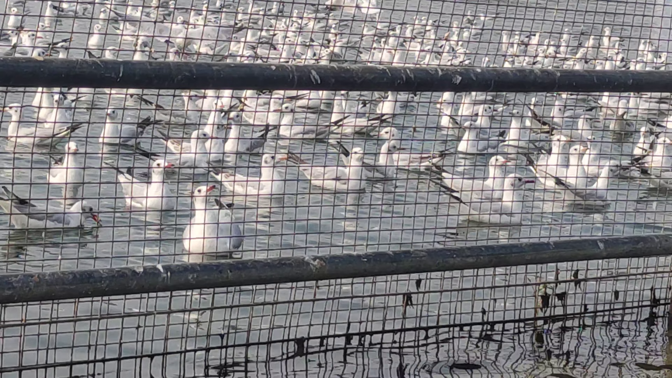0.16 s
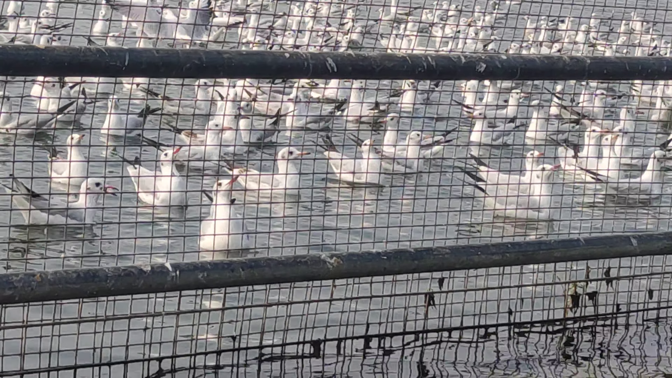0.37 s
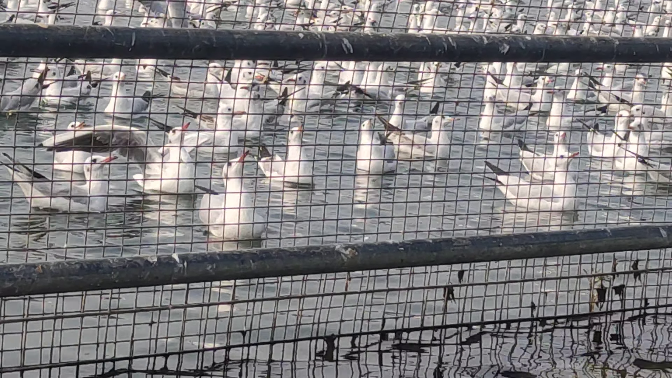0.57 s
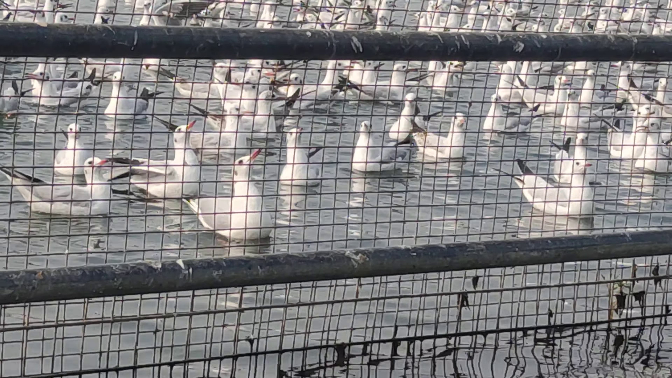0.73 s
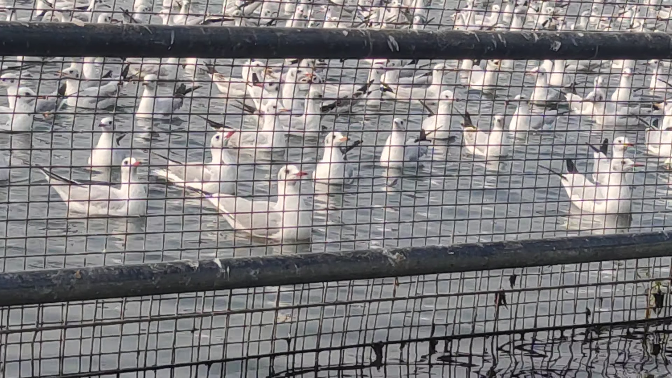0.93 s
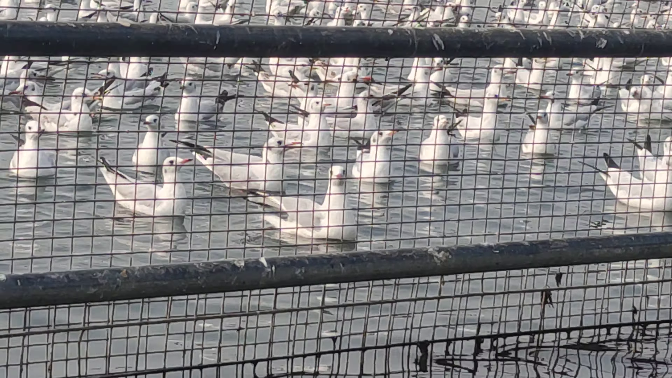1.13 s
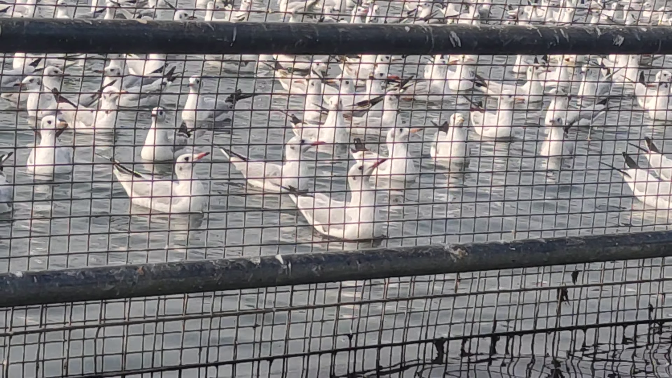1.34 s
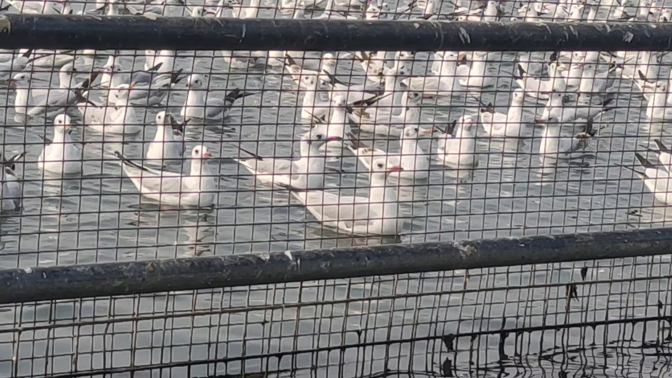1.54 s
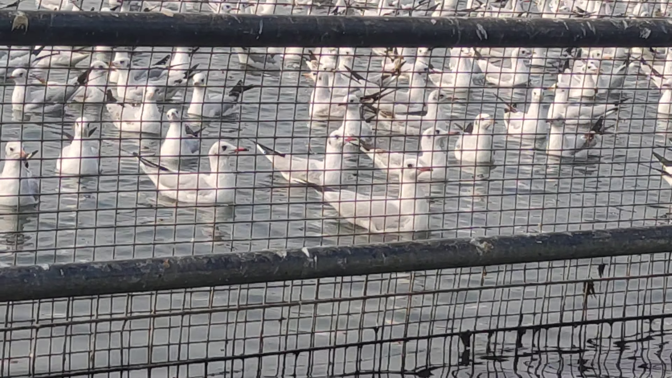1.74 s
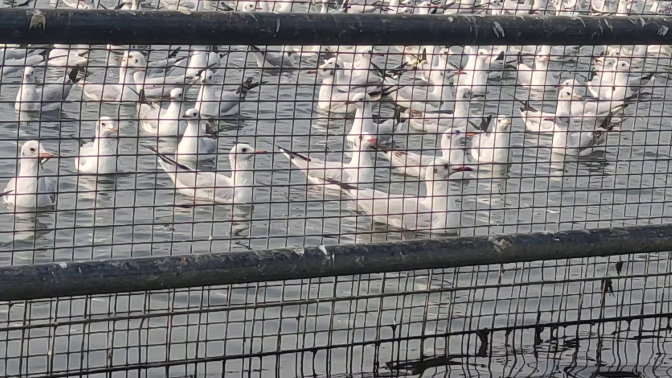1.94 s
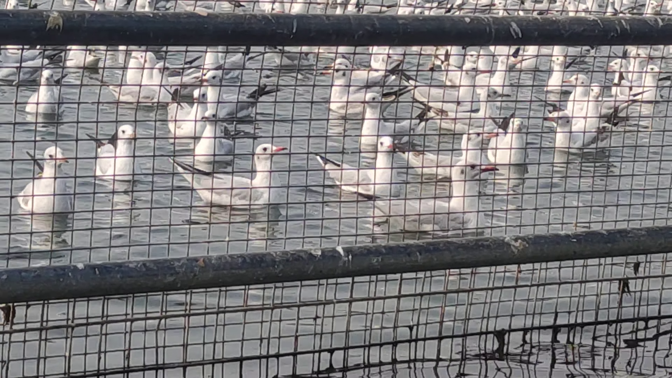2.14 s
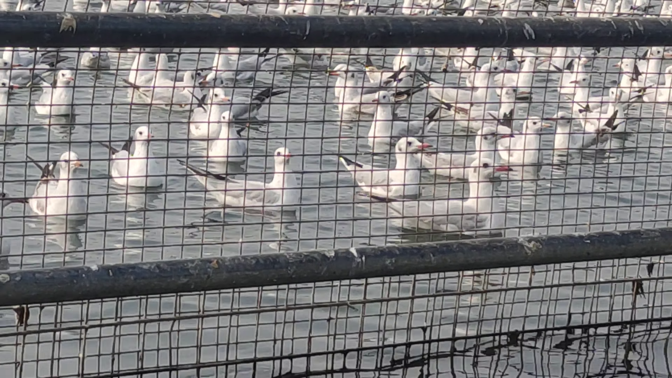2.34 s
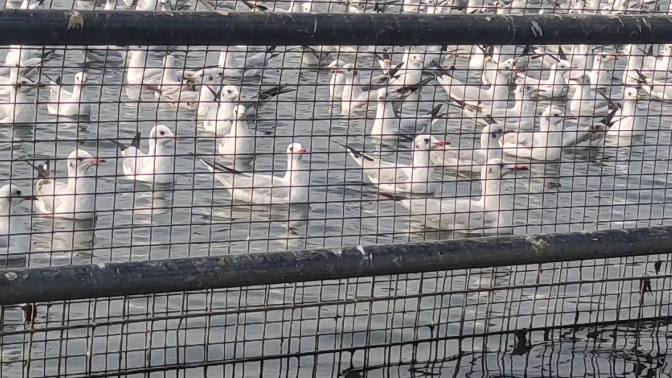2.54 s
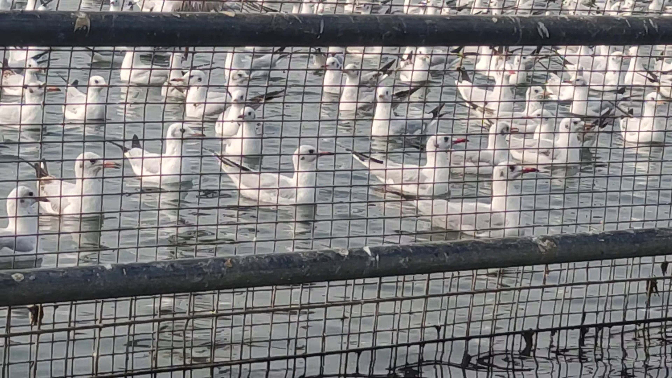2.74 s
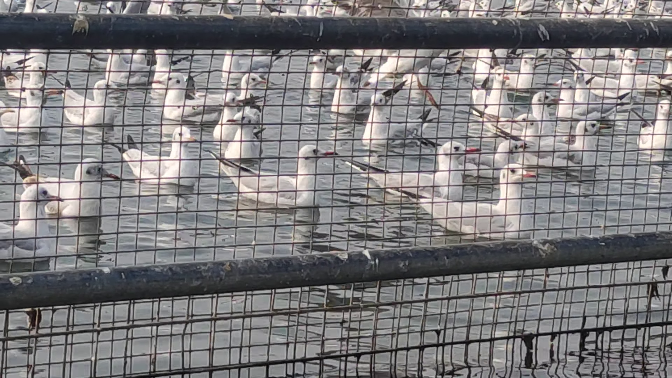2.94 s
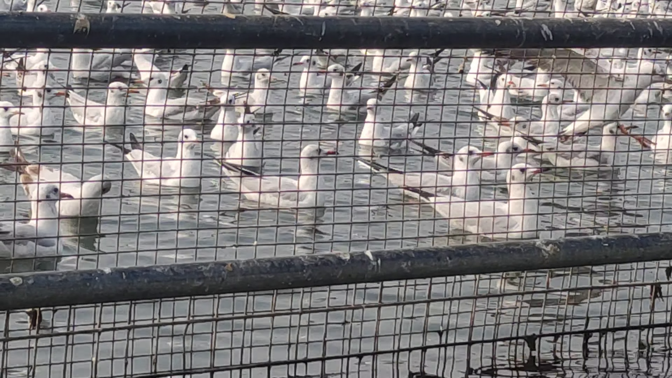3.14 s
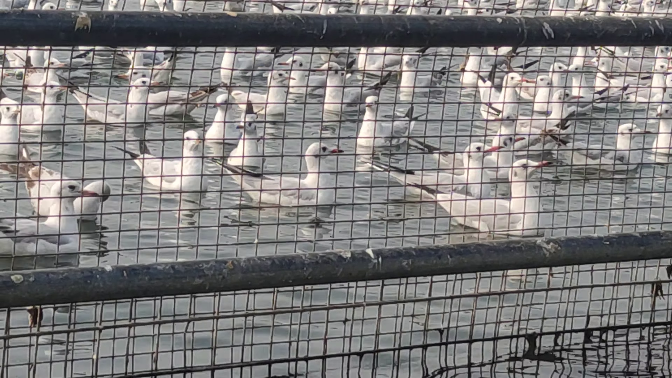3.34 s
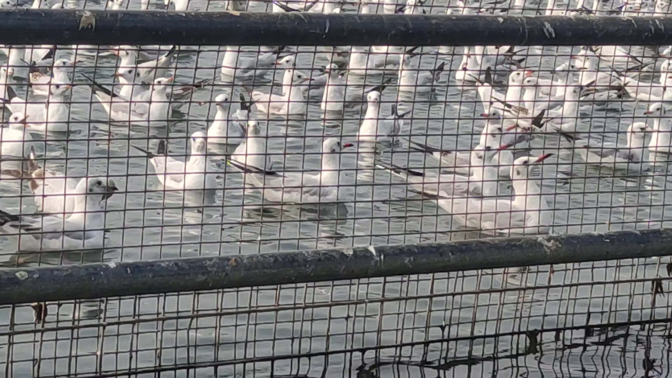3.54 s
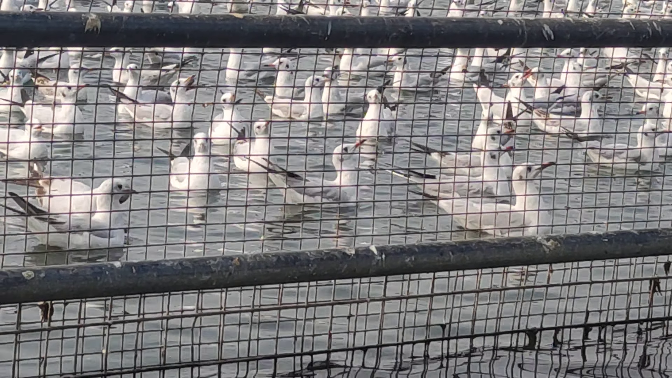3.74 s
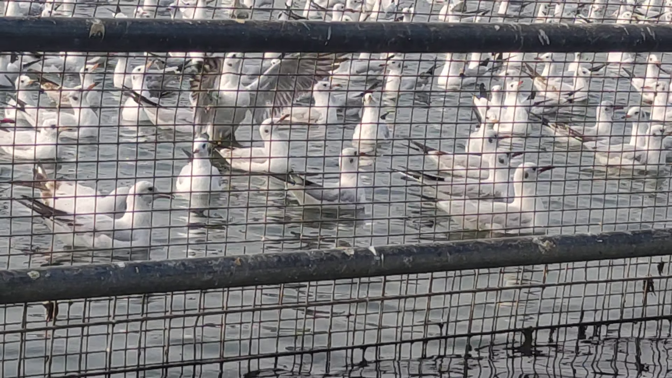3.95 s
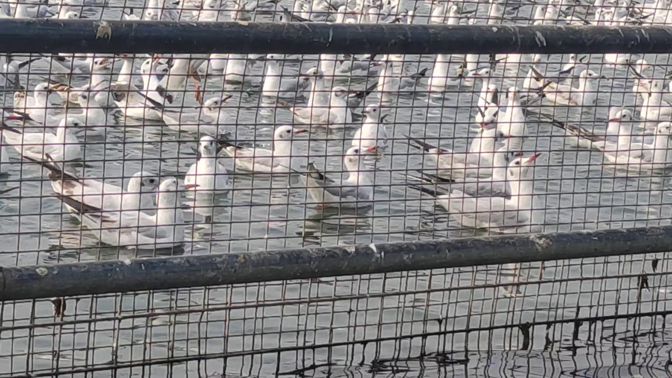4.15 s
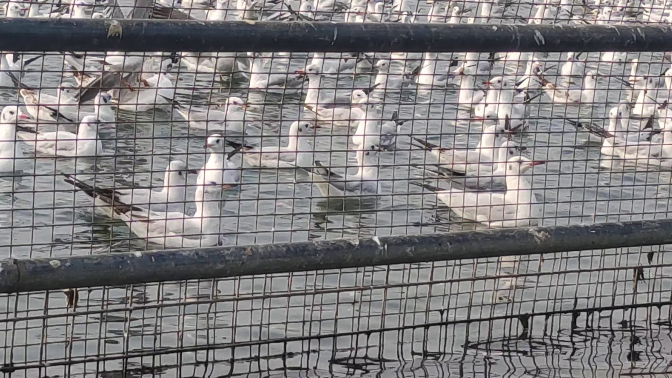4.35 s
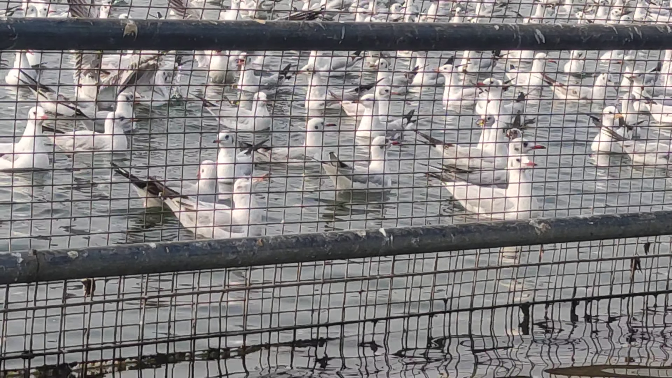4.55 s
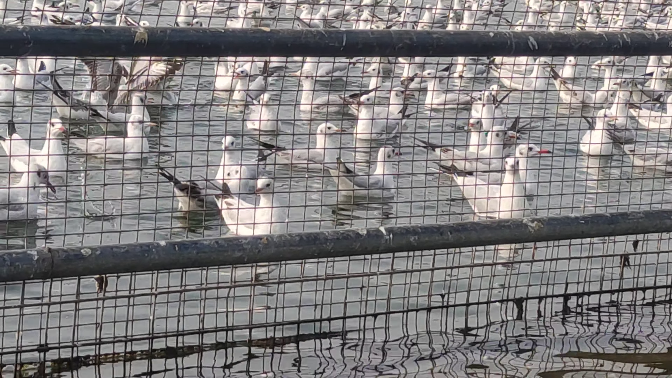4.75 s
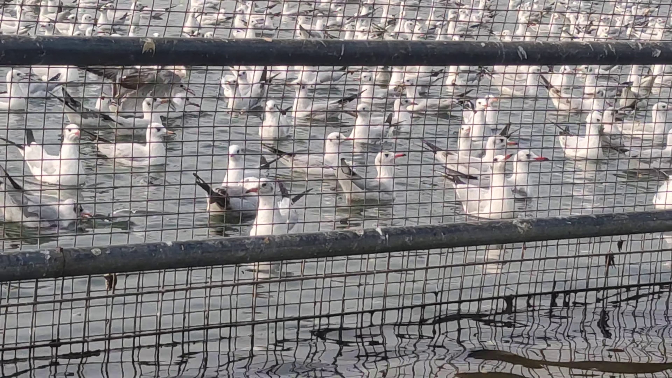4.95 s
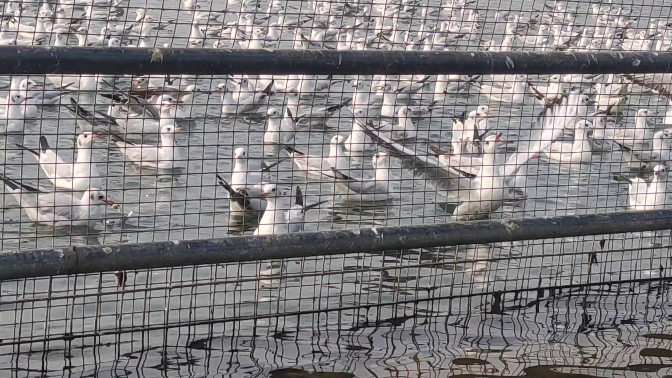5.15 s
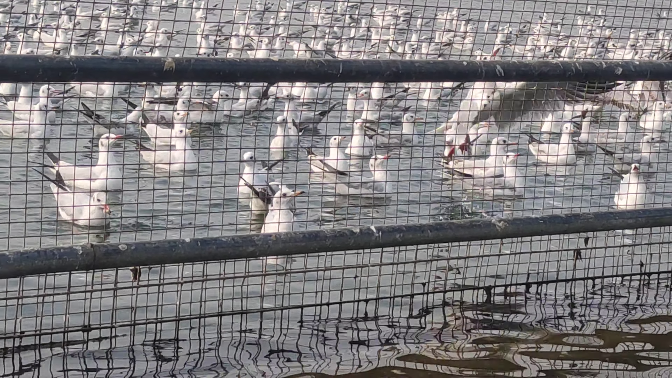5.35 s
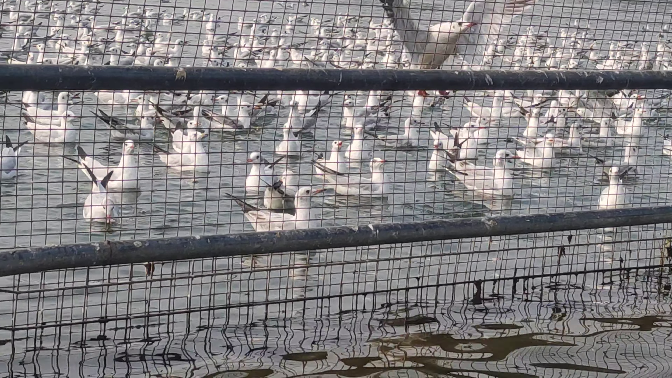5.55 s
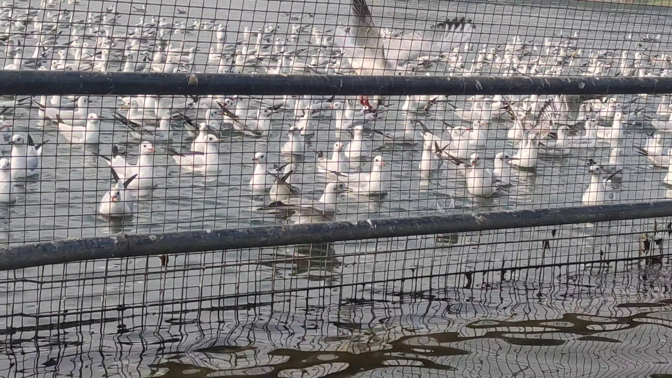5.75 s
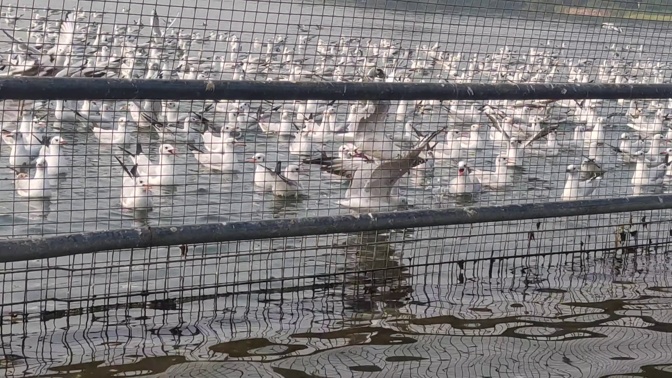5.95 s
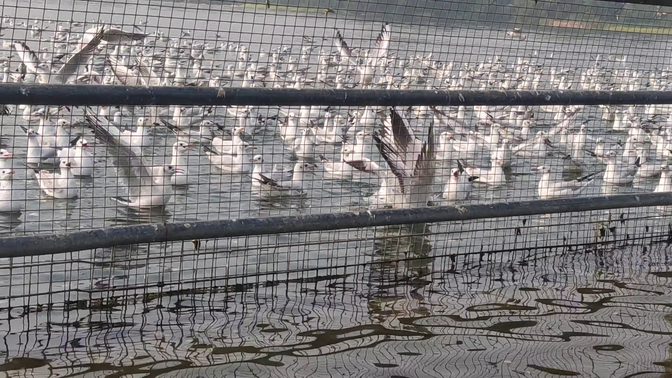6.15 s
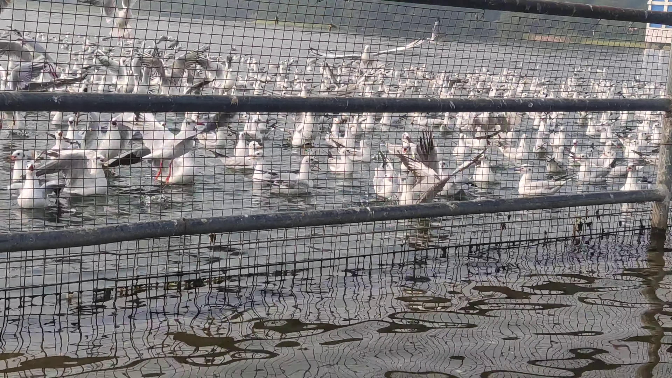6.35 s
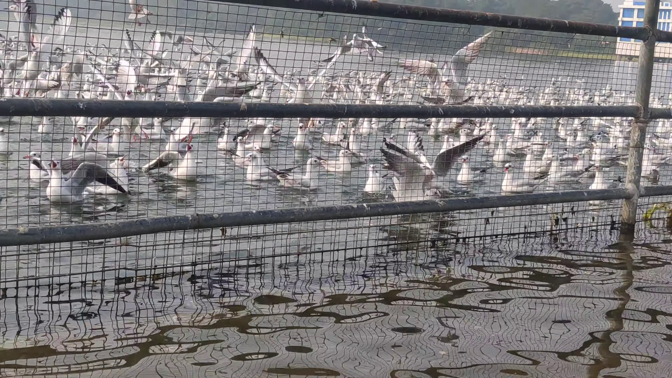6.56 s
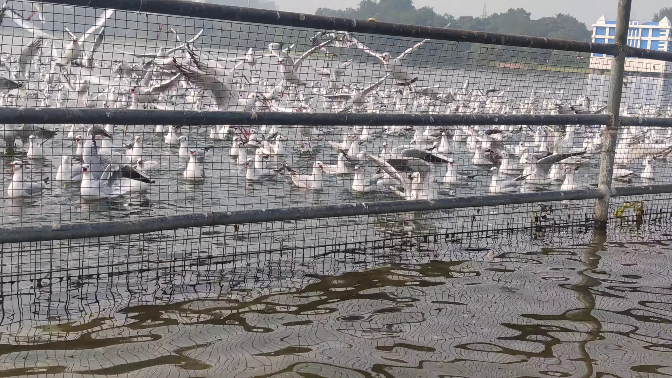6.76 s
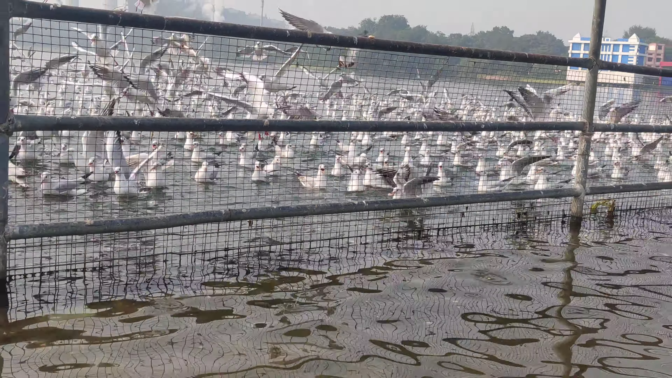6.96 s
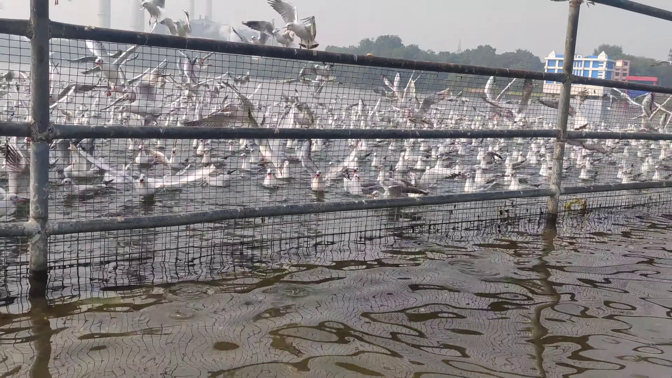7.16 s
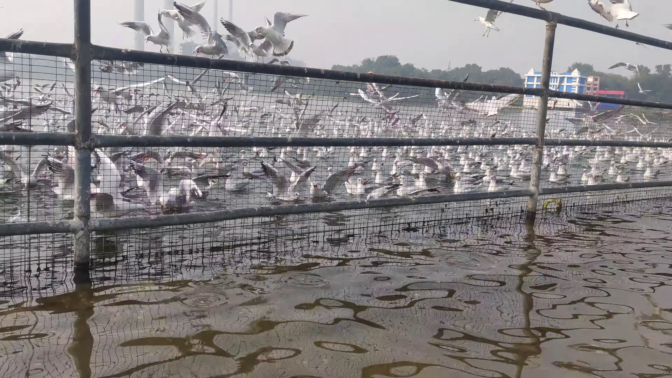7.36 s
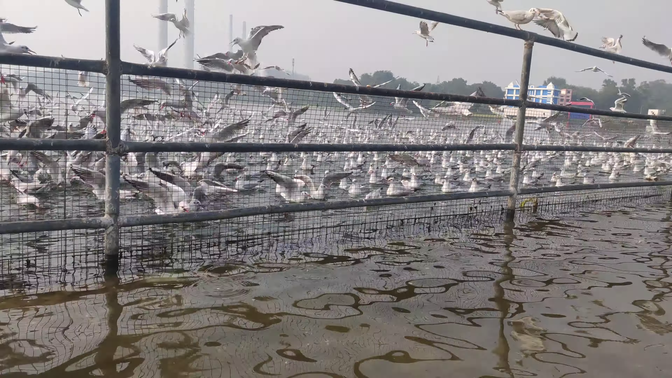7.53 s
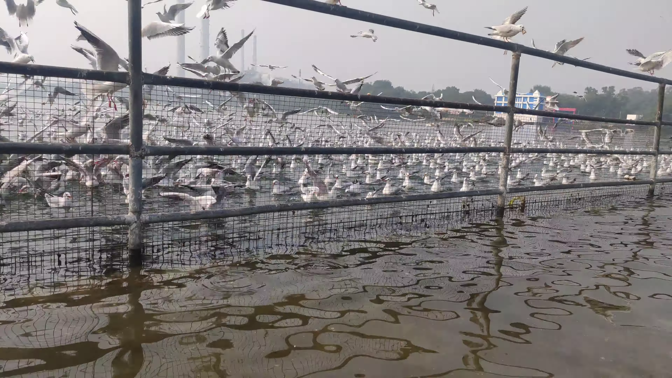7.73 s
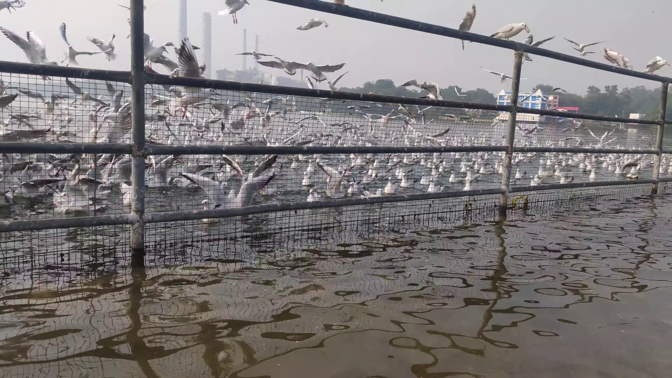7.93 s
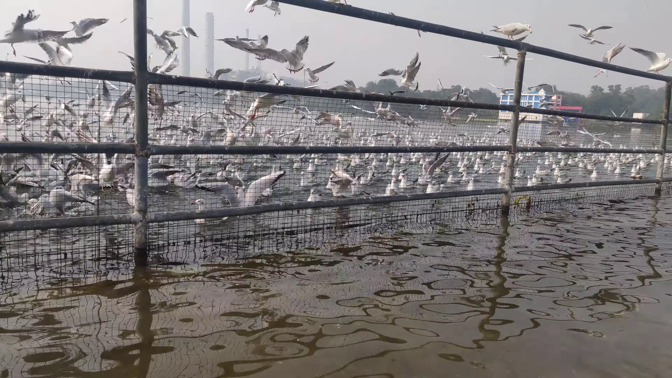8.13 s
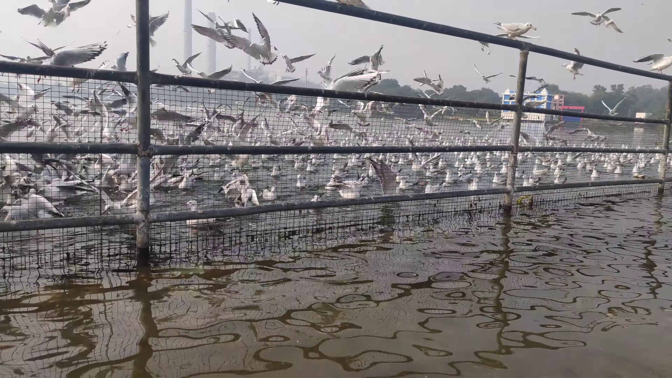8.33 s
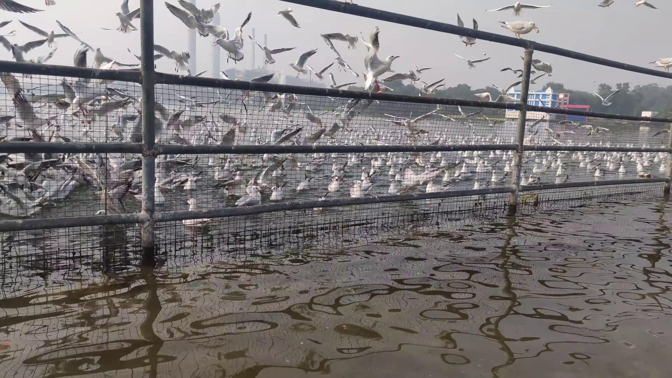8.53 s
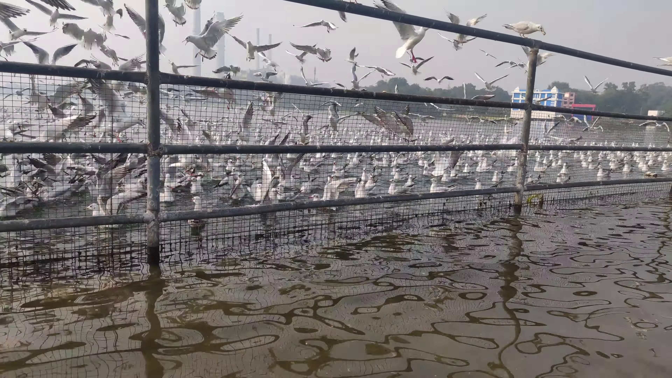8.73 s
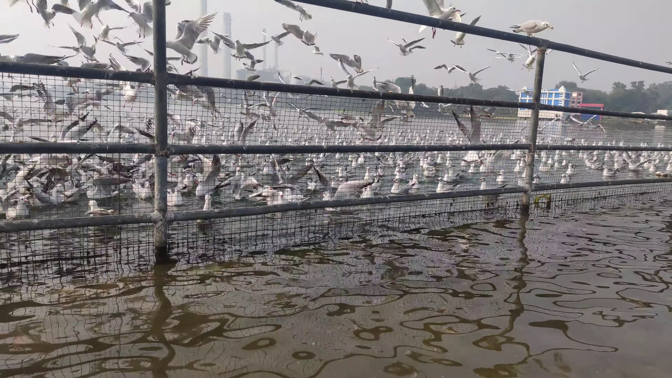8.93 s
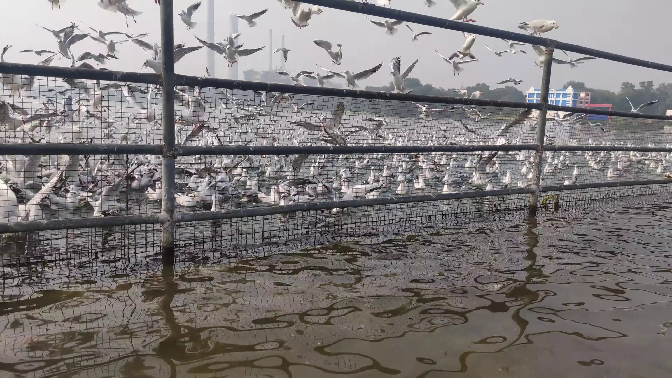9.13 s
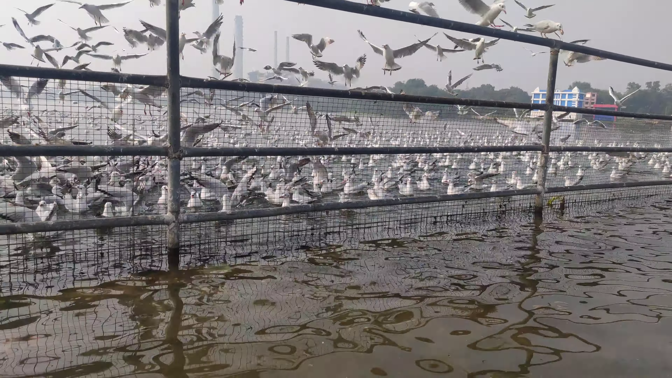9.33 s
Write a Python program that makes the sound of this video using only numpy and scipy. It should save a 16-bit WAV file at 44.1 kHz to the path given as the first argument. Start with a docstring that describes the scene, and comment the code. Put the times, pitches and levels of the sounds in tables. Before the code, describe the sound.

Heard outdoors from a lakeshore, close gulls trade hoarse squabbles, thin squeals and little barks against the constant calling of many more farther out. After the middle, birds slap the water and the whole flock rises, becoming much louder and brighter as its screeches merge with rushing wings and spray. The uproar eases only slightly by the end. The calls carry a faint echo, and a low rumble lies beneath them.

```python
"""Near gulls whistle, yelp, squeal and rasp over the chatter of a big flock sitting on a lake.
At six seconds the flock splashes off the water and hundreds of harsh screams merge over the wash
of wings and water. Each call is a wobbling membrane whose harmonics the throat weights.
The banks scatter a thin tail back, and a low rumble lies under it all."""
import sys
import numpy as np
from scipy import signal
from scipy.fft import rfft, irfft, next_fast_len
from scipy.io import wavfile
from scipy.ndimage import uniform_filter1d

SR = 44100
rng = np.random.default_rng(int(sys.argv[2]) if len(sys.argv) > 2 else 0)


def digitize_waveform(pressure):
    """Quantize a signal to 16-bit integers and store it at the path in sys.argv[1].

    Rows of a 2-D input are taken as channels; values are limited to [-1, 1].
    """
    field = np.atleast_2d(pressure).T
    bounded = np.clip(field, -1, 1)
    quanta = np.round(bounded * 32767).astype(np.int16)
    wavfile.write(sys.argv[1], SR, quanta)


N = 418509
T = np.arange(N) / SR
TOP_HZ = 7600
TAKE_OFF_S, ALL_UP_S = 6.153, 7.05


def syrinx(length_s, pitches_hz, rough, throat=np.ones_like, jitter=.08, shake=.79, edge_s=.014):
    """One call: the pitch arches, the membrane wobbles in rate and strength, the throat filters it."""
    n = int(max(length_s, .02) * SR)
    u = np.linspace(0, 1, n)
    start, middle, end = pitches_hz
    hz = start * (1 - u) + end * u + (2 * middle - start - end) * 2 * u * (1 - u)
    wobble = wander(n, 900) + .5 * wander(n, 90)
    cycles = np.cumsum(hz * (1 + rough * jitter * wobble)) / SR
    harmonics_hz = middle * np.arange(1, int((TOP_HZ + 600) / middle) + 1)
    phasors = np.exp(2j * np.pi * rng.random(24)[:len(harmonics_hz)])
    period = irfft(np.r_[0, throat(harmonics_hz) * phasors], 2048)
    wave = period[(cycles * len(period)).astype(int) % len(period)]
    edges = np.minimum(1, np.minimum(u, 1 - u) * length_s / edge_s)
    effort = .35 + .65 * np.sin(np.pi * u ** .7)  # peaks early, then runs out
    flutter = (1 + rough * shake * wander(n, 500)) * undb(2.35 * wander(n, 54.7))
    return unit(wave * edges * effort * flutter)


def cry(length_s, hz, rough, throat_hz, arch, glide):
    """A steep throat resonance picks out a few harmonics. Arch and glide are fractions of the pitch."""
    pitches_hz = hz * np.array([1 - arch - glide / 2, 1, 1 - arch + glide / 2])
    return syrinx(length_s, pitches_hz, rough, lambda f: resonance(f, throat_hz, .34 * throat_hz) ** 3)


def flock(start_s, end_s, rough, spread_db, count):
    """Many birds scream, each rising and falling at its own pitch and distance; high calls are purer."""
    out = np.zeros(N)
    for k, (when, long, high, harsh, near) in enumerate(rng.random((count, 5))):
        pitches_hz = 620 * 2 ** (1.3 * high) * np.array([.9, 1.04, .78])
        scream = syrinx(.08 + .22 * long, pitches_hz, rough * (1.1 - high + harsh))
        add(out, start_s + (end_s - start_s) * (k + when) / count, undb(spread_db * near) * scream)
    return out


def alarm(first_db, top_db, fade_db_per_s):
    """Gain that climbs as alarm spreads through the flock and sinks as the birds fly off."""
    climb_db = np.interp(T, [TAKE_OFF_S, ALL_UP_S], [first_db, top_db])
    return undb(climb_db - fade_db_per_s * np.maximum(T - ALL_UP_S, 0))


# Screams in flight. Each row: frequency in Hz, relative level in dB.
UPROAR_SPECTRUM = [(900, -28.5), (1400, -23.5), (1750, -12), (2020, -5), (2230, -1), (2550, -6), (2950, -9),
                   (3400, -4.5), (4100, -7.5), (4600, -8.5), (5050, -10), (5700, -12), (7300, -14),
                   (8200, -6)]
def uproar(wash_db=-20, onset_s=.34):
    """Take-off: screams pile up and brighten while wings thrash the water."""
    birds = flock(5.4, N / SR + .1, rough=.7, spread_db=13, count=480)
    voices = colour(lake(birds, wet_db=-15.5), UPROAR_SPECTRUM)
    treble = shape(voices, lambda f: 1 - 1 / (1 + (f / 3500) ** 10))
    brightness = alarm(first_db=-10, top_db=-1.2, fade_db_per_s=.65)
    screams = steady(voices - treble) + brightness * steady(treble)
    wash_hz_db = [(60, -28.5), (170, 5), (450, 13), (750, 11.5), (1300, 8), (3000, -25), (8000, -40.5)]
    wash = colour(rng.standard_normal(N), wash_hz_db) * undb(wash_db + 1.3 * wander(N, 21))
    onset = np.clip(1 + (T - TAKE_OFF_S) / onset_s, 0, 1) ** 2
    return onset * alarm(first_db=-20, top_db=-12.5, fade_db_per_s=1.26) * (screams + wash)


# Each row: start in seconds, length in seconds, pitch in Hz, glide as a fraction of pitch, level in dB.
WHISTLE_CALLS = [(.44, 0.24, 2523, 0.0086, -28.5), (.47, .1, 2170, 0.073, -28),
                 (.78, 0.158, 2435, .03, -33.5), (1.47, 0.084, 2320, .1, -29.5),
                 (1.828, .15, 2055, -.08, -31.5), (2.04, 0.16, 3160, -.05, -36),
                 (2.157, .2, 1975, -.04, -35.5), (2.22, .14, 2950, -.07, -40),
                 (2.94, 0.46, 2520, -0.079, -32), (4.188, 0.06, 2780, 0, -31),
                 (4.258, 0.12, 1980, .04, -29.5), (6.09, 0.044, 2380, 0, -25.5),
                 (6.241, 0.11, 2470, .02, -29), (7.367, 0.075, 3500, 0.00092, -19),
                 (8.725, .087, 3790, .05, -21)]
def whistles(rough=.2):
    """Nearly level calls, a little hoarse, with the throat tuned to the pitch."""
    out = np.zeros(N)
    for start_s, length_s, hz, glide, db in WHISTLE_CALLS:
        add(out, start_s, undb(db) * cry(length_s, hz, rough, throat_hz=hz, arch=.025, glide=glide))
    return out


# Each row: start in seconds, length in seconds, pitch in Hz, level in dB.
YELP_CALLS = [(.535, 0.089, 2100, -26), (0.714, 0.11, 1720, -36.5), (1.346, .05, 1950, -28.5),
              (2.017, 0.034, 2040, -26), (2.385, 0.037, 1950, -30.5), (3.32, 0.077, 1800, -31),
              (3.516, .06, 1920, -33), (3.922, 0.049, 2150, -29.5), (5.662, 0.068, 2270, -31.5)]
def yelps(rough=.63, throat_hz=2050):
    """Hoarse little barks that drop through the throat resonance."""
    out = np.zeros(N)
    for start_s, length_s, hz, db in YELP_CALLS:
        add(out, start_s, undb(db) * cry(length_s, hz, rough, throat_hz, arch=.03, glide=-.35))
    return out


# Rasping throat. Each row: frequency in Hz, relative level in dB.
RASP_SPECTRUM = [(900, -25), (1500, -11.5), (2000, 7), (2500, 5.5), (3000, 1.5), (4200, -11.5), (5600, -21),
                 (7200, -11), (8000, -28.5)]
# Each row: start in seconds, length in seconds, level in dB, bill resonance in Hz, bill re throat in dB.
RASP_CALLS = [(0, 0.28, -31, 4030, -5), (0.054, .21, -38.5, 6270, 9), (0.364, 0.25, -34.5, 3000, -14),
              (0.661, .25, -30.5, 3170, -11), (0.855, .2, -31, 6470, -15), (1.195, 0.22, -36.5, 6660, -15),
              (1.509, .12, -34, 3260, -12), (1.935, 0.17, -30.5, 4500, -6), (2.129, 0.28, -29, 4600, -12),
              (2.498, 0.33, -28, 4580, -6.5), (2.92, 0.35, -34.5, 4800, -2), (3.2, .22, -35, 4300, -19),
              (3.579, .15, -33, 5270, -17), (4.072, 0.19, -31, 3280, -3), (4.295, 0.25, -31, 4730, -10.5),
              (4.869, 0.31, -33, 6550, -18), (5.797, 0.26, -33, 3260, -3)]
def rasps(pitch_hz=820, bill_width_hz=1400):
    """Near birds squabble: a low unsteady voice rings the throat and, above it, the open bill."""
    out = np.zeros(N)
    for start_s, length_s, db, bill_hz, bill_db in RASP_CALLS:
        pitches_hz = pitch_hz * undb(rng.standard_normal()) * np.array([.98, 1.01, .96])
        voice = syrinx(length_s, pitches_hz, rough=.9)
        throat = colour(voice, RASP_SPECTRUM)
        bill = undb(bill_db) * band(voice, bill_hz, bill_width_hz)
        add(out, start_s, undb(db) * unit(throat + bill))
    return out


# Each row: start in seconds, length in seconds, pitch in Hz, level in dB, roughness from 0 to 1,
# throat resonance in Hz.
SQUEAL_CALLS = [(0.078, 0.14, 1254, -42, 0.2, 6200), (0.202, .13, 2170, -40, .04, 5140),
                (0.762, .18, 2500, -41.5, .2, 4100), (1.07, .28, 2570, -33.5, 0.04, 3610),
                (1.39, 0.15, 1096, -45.5, .03, 6000), (2.29, 0.084, 1187, -37.5, 0.42, 6920),
                (2.68, 0.088, 2005, -35, .2, 4000), (2.83, .14, 1090, -44, 0.17, 5800),
                (3.414, .18, 2160, -38, 0.2, 5030), (3.595, .16, 1320, -36.5, .3, 3970),
                (3.649, 0.091, 1346, -39.5, 0.34, 6700), (3.81, 0.15, 2830, -40, .08, 3850),
                (4.617, .15, 1905, -60, .05, 7340), (4.77, 0.24, 2850, -41, 0.16, 4020),
                (5.255, 0.13, 1133, -45.5, 0, 5900), (5.438, .14, 1250, -52.5, 0.1, 7400),
                (5.691, 0.13, 2850, -39, .12, 3920), (7.045, 0.19, 2500, -24, 0.48, 4500)]
def squeals():
    """Thin arched calls, clean to hoarse; a throat set high rings their overtones."""
    out = np.zeros(N)
    for start_s, length_s, hz, db, rough, throat_hz in SQUEAL_CALLS:
        add(out, start_s, undb(db) * cry(length_s, hz, rough, throat_hz, arch=.045, glide=-.025))
    return out


# Each row: start in seconds, decay time in seconds, level in dB.
WATER_SLAPS = [(6.022, 0.028, -26.5), (6.085, 0.026, -24), (6.415, 0.12, -19)]
def splashes(attack_s=.008):
    """The first birds to leave slap the water and throw up bursts of spray."""
    spray = band(rng.standard_normal(N), hz=5200, width_hz=5500)
    bursts = (undb(db) * np.clip((T - start_s) / attack_s, 0, 1) * np.exp(-np.abs(T - start_s) / decay_s)
              for start_s, decay_s, db in WATER_SLAPS)
    return spray * sum(bursts)


# Each row: peak time in seconds, level in dB.
DOWNSTROKES = [(7.76, -32.5), (7.83, -42), (8.02, -35), (8.6, -40), (8.72, -34)]
def wingbeats(sigma_s=.044):
    """Each close downstroke pushes a soft puff of air."""
    air = band(rng.standard_normal(N), hz=155, width_hz=45)
    return air * sum(undb(db) * np.exp(-.5 * ((T - peak_s) / sigma_s) ** 2) for peak_s, db in DOWNSTROKES)


# Distant voices. Each row: frequency in Hz, relative level in dB.
CHATTER_SPECTRUM = [(900, -29.5), (1300, -21), (1550, -9.5), (2000, -6.5), (2400, -2.5), (2750, -5.5),
                    (3000, -10), (3800, -13.5), (5000, -19), (6000, -25), (7800, -29.5)]
def chatter(db=-29, fade_db_per_s=.36):
    """Birds farther out call all the time and slowly calm down."""
    voices = lake(flock(-.3, N / SR, rough=.58, spread_db=15, count=400), wet_db=-7)
    return steady(colour(voices, CHATTER_SPECTRUM)) * undb(db - fade_db_per_s * T)


def far_squeals(db=-51, spread_db=8, rough=.1, count=22):
    """Faint squeals from farther out while the flock sits."""
    out = np.zeros(N)
    for k, (when, long, high, bend, throat, far) in enumerate(rng.random((count, 6))):
        hz, throat_hz = 1000 * 2 ** (1.2 * high), 4600 + 2000 * throat
        call = cry(.08 + .14 * long, hz, rough, throat_hz, arch=.045, glide=.16 * (bend - .6))
        add(out, TAKE_OFF_S * (k + when) / count, undb(db - spread_db * far) * call)
    return out


# Each row: frequency in Hz, relative level in dB.
RUMBLE_SPECTRUM = [(15, -9), (28, 4), (60, -3), (110, -6.5), (170, -4.5), (260, -9.5), (360, -13.5),
                   (500, -8), (720, -8.5), (1100, -12), (1500, -9), (3000, -21), (7000, -32.5)]
# Each row: centre in Hz, width in Hz, level in dB.
HUM_BANDS = [(301.7, 14, -49.5), (434.7, 45, -46.5), (717.3, 74, -48)]
def rumble(db=-33):
    """Distant rumble with a few broad humming tones."""
    out = colour(rng.standard_normal(N), RUMBLE_SPECTRUM) * undb(db + 1.5 * wander(N, 2.06))
    for hz, width_hz, hum_db in HUM_BANDS:
        out += undb(hum_db) * band(rng.standard_normal(N), hz, width_hz)
    return out


def lake(x, wet_db, t60_s=.56, delay_s=.012):
    """Bank and far shore scatter a thin tail back over the water."""
    t = T[:SR]
    tail = rng.standard_normal(SR) * undb(-60 * t / t60_s) * (t > delay_s)
    return x + undb(wet_db) * signal.fftconvolve(x, tail / np.linalg.norm(tail))[:N]


def undb(db):
    """Decibels to gain."""
    return 10 ** (np.asarray(db) / 20)


def unit(x):
    """Scale to rms 1."""
    return x / np.sqrt(np.mean(x ** 2) + 1e-18)


def steady(x, window_s=.15):
    """Hold the running rms at 1, as when many birds take turns."""
    return x / np.sqrt(uniform_filter1d(x ** 2, int(window_s * SR)) + 1e-9)


def shape(x, gain):
    """Filter by a gain that is a function of frequency."""
    size = next_fast_len(len(x) + 512)
    hz = np.fft.rfftfreq(size, 1 / SR) + 1e-6
    return irfft(rfft(x, size) * gain(hz), size)[:len(x)]


def colour(x, points):
    """Filter by a curve of (Hz, dB) points; output at rms 1."""
    hz, db = np.transpose(points)
    return unit(shape(x, lambda f: undb(np.interp(np.log(f), np.log(hz), db))))


def resonance(f, hz, width_hz):
    """Gain of one resonance, 1 at its centre."""
    return 1 / np.sqrt(1 + ((f * f - hz * hz) / (f * width_hz)) ** 2)


def band(x, hz, width_hz):
    """Filter by a squared resonance; output at rms 1."""
    return unit(shape(x, lambda f: resonance(f, hz, width_hz) ** 2))


def wander(n, rate_hz):
    """Random drift: straight lines between Gaussian values drawn at rate_hz."""
    knots = rng.standard_normal(n // 16 + 2)
    return np.interp(np.arange(n) * rate_hz / SR, np.arange(len(knots)), knots)


def add(out, start_s, x):
    """Mix x in at start_s."""
    i = int(start_s * SR)
    a, b = max(i, 0), min(i + len(x), N)
    if b > a:
        out[a:b] += x[a - i:b - i]


def scene():
    """The flock heard from one point on the shore; both channels alike."""
    single_birds = whistles() + yelps() + squeals() + far_squeals() + rasps() + splashes()
    mono = lake(single_birds, wet_db=-12.5) + chatter() + uproar() + wingbeats() + rumble()
    return np.array([mono, mono])


def record(dry, ceiling=.88):
    """Round the highest peaks, then low-pass at TOP_HZ."""
    rounded = dry / (1 + (dry / ceiling) ** 8) ** (1 / 8)
    return signal.sosfiltfilt(signal.cheby1(10, .1, TOP_HZ, fs=SR, output="sos"), rounded)


dry = scene()
out = record(dry)
digitize_waveform(out)
```